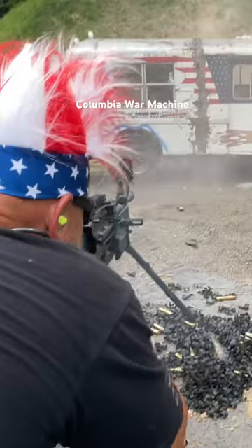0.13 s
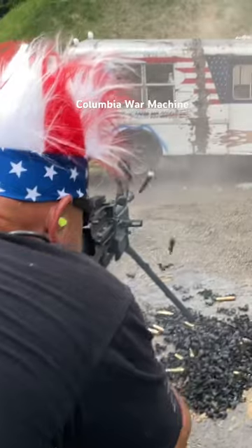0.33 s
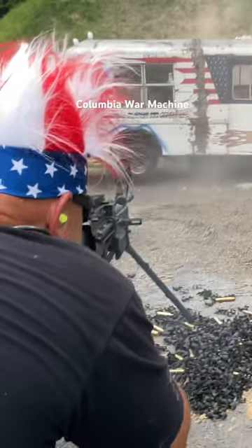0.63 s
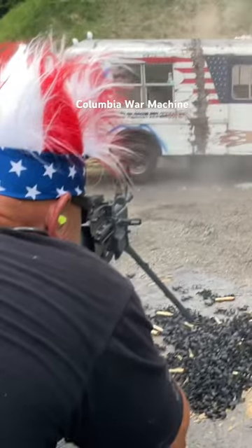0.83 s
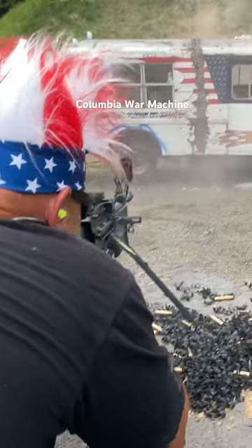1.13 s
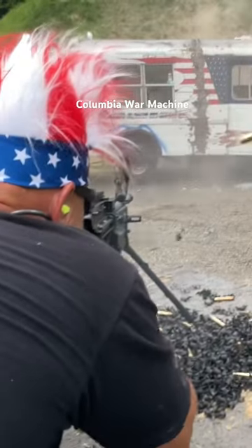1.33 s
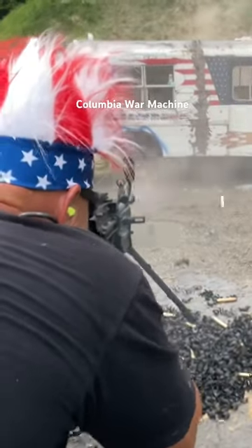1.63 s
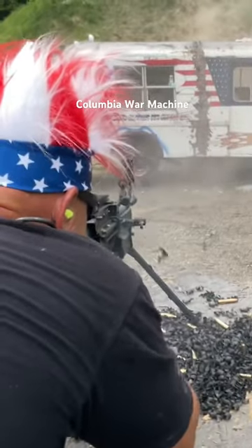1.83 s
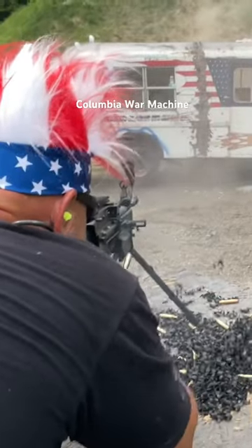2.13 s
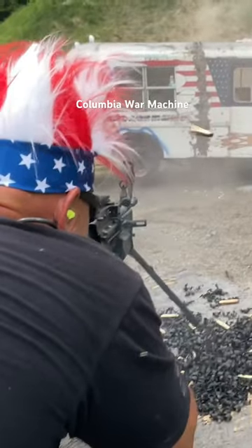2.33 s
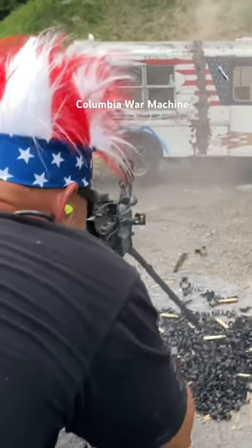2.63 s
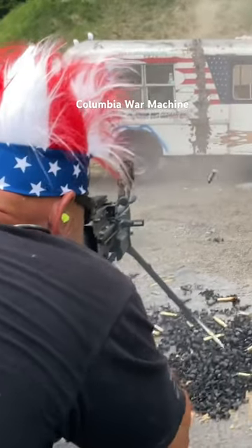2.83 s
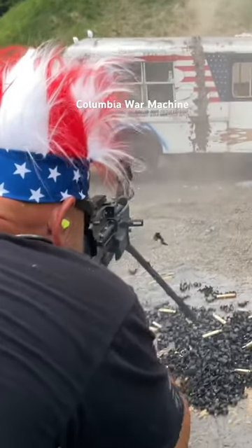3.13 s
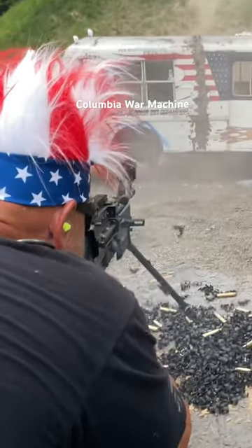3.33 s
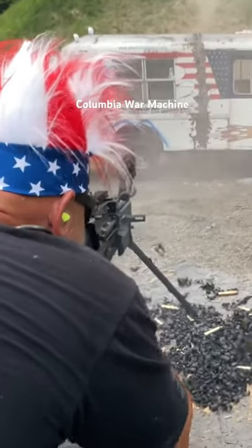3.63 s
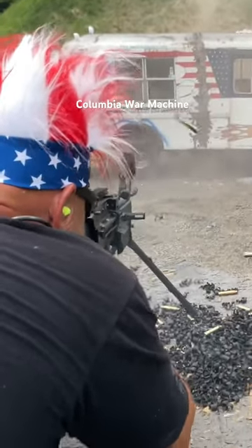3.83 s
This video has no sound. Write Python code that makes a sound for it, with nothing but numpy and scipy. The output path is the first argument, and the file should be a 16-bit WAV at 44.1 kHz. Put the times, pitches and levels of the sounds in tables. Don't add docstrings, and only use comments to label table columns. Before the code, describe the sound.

Close machine gun fire outdoors: a few rapid shots already under way, a half-second gap with rolling woodland echo and faint case clinks, then continuous even fire with metallic bolt clatter, loud and compressed in stereo.

```python
import sys
import numpy as np
from scipy import signal
from scipy.fft import rfft, irfft, next_fast_len
from scipy.io import wavfile
from scipy.ndimage import map_coordinates

SR = 44100
rng = np.random.default_rng(int(sys.argv[2]) if len(sys.argv) > 2 else 0)


def gain_from_db(level_db):
    decades = np.asarray(level_db, float) / 20
    return 10 ** decades


def waveform_to_disk(signal):
    frames = np.transpose(np.atleast_2d(signal))
    scaled = np.clip(frames, -1, 1) * 32767
    samples = np.round(scaled).astype(np.int16)
    wavfile.write(sys.argv[1], SR, samples)


N = 176400
PAD = SR // 4
CYCLE_S = .073534

# (frequency [Hz], density [dB per Hz])
HISS_SPECTRUM = [(1000, -3), (2500, -6.5), (5000, -1.5), (8200, 2), (11500, -2), (15800, 2.5)]
# (frequency [Hz], density [dB per Hz])
METAL_SPECTRUM = [(700, -1), (2000, -2), (4000, 0.5), (6500, 0), (9800, -3), (13000, -11), (15800, -11.5)]


def unit(x):
    return x / np.sqrt(np.mean(x ** 2) + 1e-20)


def along(points, hz):
    f, value = np.transpose(points)
    return np.interp(np.log(hz + 1), np.log(f + 1), value)


def filtered(x, response):
    size = next_fast_len(x.shape[-1] + SR // 2)
    spectrum = rfft(x, size) * response(np.fft.rfftfreq(size, 1 / SR))
    return irfft(spectrum, size)[..., :x.shape[-1]]


def train(times, gains):
    at = np.clip(np.round(times * SR).astype(int) + PAD, 0, N + PAD)
    return np.bincount(at, gains, N + PAD + 1)[:N + PAD]


def after(impulses, shape):
    return signal.fftconvolve(np.atleast_2d(impulses), np.atleast_2d(shape), axes=1)[:, :N + PAD]


def fall(t60, rise_s):
    t = np.arange(SR // 2) / SR
    return gain_from_db(-60 * t / t60) * (1 - np.exp(-t / rise_s)) ** 2


def near_noise(spectrum):
    # (frequency [Hz], phase [rad])
    port_phase = [(0, 0), (600, .6), (1460, .2), (2330, -2.6), (4390, -7), (7000, -8.3), (8500, -9.4),
                  (11500, -11.4), (13500, -12.5)]
    # (frequency [Hz], level [dB])
    port_lean = [(300, 2.5), (2400, 6), (4400, 0), (8000, 0)]
    alike = 0.84
    a, b, c = rng.standard_normal((3, N + PAD))
    pair = np.sqrt(alike) * a + np.sqrt(1 - alike) * np.array([b, c])
    side = np.array([[.5], [-.5]])

    def response(hz):
        level = gain_from_db(along(spectrum, hz) + side * along(port_lean, hz))
        return level * np.exp(1j * side * along(port_phase, hz))

    return unit(filtered(pair, response))


def wide_noise(spectrum, size):
    # (frequency [Hz], correlation [1])
    likeness = [(40, 0.76), (130, 1), (300, 0.9), (700, 0.48), (4000, 0.12)]

    def response(hz):
        turn = np.arccos(np.clip(along(likeness, hz), -1, 1)) / 2
        return gain_from_db(along(spectrum, hz)) * [np.cos(turn), np.sin(turn)]

    mid, side = filtered(rng.standard_normal((2, size)), response)
    return unit(np.array([mid + side, mid - side]))


def firing():
    # (first shot [s], shots [count])
    bursts = [
        (-.0757, 6),
        (.9182, 42),
    ]
    # (time [s], lag behind the even cycle [s])
    drag = [(0, -.0), (.9, -.0017), (1.3, .0002), (1.8, .0001), (2.15, .0016), (2.45, .0011), (2.6, .0002),
            (3.0, .0001), (3.2, -.0012), (3.65, .0), (4, -.0003)]
    jitter_s, scatter_db = .0002, 1.11
    even = np.concatenate([s + CYCLE_S * np.arange(count) for s, count in bursts])
    luck = rng.standard_normal((len(even), 12))
    times = even + np.interp(even, *np.transpose(drag)) + jitter_s * luck[:, 0]
    return times, gain_from_db(scatter_db * luck[:, 1]), luck[:, 2:]


def shaded(f):
    # (frequency [Hz], width [Hz], level [dB])
    modes = [(236.5, 37, -9.5), (437, 40, 3), (673, 77, -5), (1038, 72, 4.5), (1138, 95, -5.5),
             (1254, 47, 2), (1425, 107, 0.5), (1600, 53, 4.5), (2390, 120, 4)]
    return np.prod([1 + (gain_from_db(db) - 1) * 1j * f * w / (c * c - f * f + 1j * f * w) for c, w, db in modes], axis=0)


def blast():
    path_s = [.0014, .0029, .0045, .0057, .0089, .0111, .0128, .0146, .0195, .025, .0286, .0325]
    # (left level [dB], right level [dB])
    path_levels = [(-15, -39), (-1, -16.5), (-15.5, -45), (-9, -8.5), (-3.5, -10), (-4.5, -8.5), (-12, -26),
                   (-10.5, -15.5), (-16.5, -16.5), (-11.5, -13), (-42.5, -38), (-20.5, -18.5)]
    # (frequency [Hz], density [dB per Hz])
    scatter_spectrum = [(250, -0.5), (350, 13), (520, 3), (750, -16), (1050, 5.5), (1350, 3), (2400, -13.5),
                        (4000, -50)]
    # frequency [Hz], trough [s], centre [s], half length [s]
    ground_wave = (150, .023, .0212, .0054)
    blast_db, scatter_db, thump_db, thump_lean_db = -7.5, -19.5, -22, 2.5
    push_s, lengthens = 0.00027, .025
    t = np.arange(SR // 10) / SR
    out = np.zeros((2, len(t)))
    for s, db in zip(path_s, path_levels):
        u = np.clip((t - s) / (push_s + lengthens * s) + 1, 0, None)
        pulse = u * (2 - u) * np.exp(1 - u)
        out += gain_from_db(blast_db + np.array(db))[:, None] * pulse

    def low_cut(f):
        edge = 1j * f / 210
        return edge ** 2 / (1 + edge + edge ** 2)

    out = filtered(out, low_cut)
    scatter = fall(0.079, 0.002) * near_noise(scatter_spectrum)[:, :SR // 2]
    out += gain_from_db(scatter_db) * scatter[:, :len(t)]
    hz, trough_s, centre_s, half_s = ground_wave
    wave = -np.cos(2 * np.pi * hz * (t - trough_s)) * np.exp(-.5 * ((t - centre_s) / half_s) ** 2)
    return out + gain_from_db(thump_db + thump_lean_db * np.array([[.5], [-.5]])) * wave


def shots(times, sizes, luck):
    # (delay [s], level [dB])
    echoes = [
        (.0802, -9),
        (.1105, -14),
        (.152, -23),
        (.192, -21),
    ]
    # (frequency [Hz], density [dB per Hz])
    crack_spectrum = [(700, -25), (1500, 3), (2500, 6.5), (5000, -5), (8200, 0), (9800, -12.5), (11500, -8),
                      (15800, -1.5)]
    crack_db, hiss_db, slap_body_db = -17, -30, 3
    lead_s, slap_jitter_s, slap_shortens_s = 0.002, 0.00061, 0.018
    slaps = 0
    for k, (s, db) in enumerate(echoes):
        slaps = slaps + train(times + s + slap_jitter_s * luck[:, k], sizes * gain_from_db(db))
    direct = train(times, sizes)
    one = filtered(blast(), shaded)
    short = one * gain_from_db(slap_body_db) * np.exp(-np.arange(one.shape[1]) / SR / slap_shortens_s)

    def slap_band(f):
        return 2360 / (2360 + 1j * f) * 1j * f / (200 + 1j * f)

    def slap_dulling(f):
        return (4000 / (4000 + 1j * f)) ** 2

    def snap(hits):
        early = np.roll(hits, -round(lead_s * SR))
        return after(early, fall(0.04, 0.0018)) * near_noise(crack_spectrum)

    body = after(direct, one) + after(filtered(slaps, slap_band), short)
    crack = snap(direct) + filtered(snap(slaps), slap_dulling)
    hiss_power = np.abs(after(direct, fall(0.2, .008) ** 2))
    hiss = gain_from_db(hiss_db) * np.sqrt(hiss_power) * near_noise(HISS_SPECTRUM)
    return body + gain_from_db(crack_db) * crack + hiss


def tail(times, sizes):
    # (frequency [Hz], density [dB per Hz])
    tail_spectrum = [(35, -30), (65, -5.5), (230, -9.5), (450, -2), (800, -6), (2100, -17.5), (8400, -21.5),
                     (15800, -19)]
    # (frequency [Hz], t60 [s])
    tail_t60 = [(100, 1.33), (500, 1.51), (2000, 1.25), (6000, 1.07), (14000, 0.49)]
    tail_db, grain_db = -36.5, 2.5
    out = 0
    for k in range(3):
        grain = map_coordinates(rng.standard_normal(200), [np.arange(2 * SR) * 60 / SR])
        lumps = gain_from_db(grain_db * grain)
        hz, t, z = signal.stft(wide_noise(tail_spectrum, size=2 * SR) * lumps, SR, nperseg=512)
        decay = gain_from_db(-60 * t / along(tail_t60, hz)[:, None]) * (1 - np.exp(-t / 0.026))
        roll = signal.istft(z * decay, SR, nperseg=512)[1]
        out = out + after(train(times[k::3], sizes[k::3]), roll)
    return gain_from_db(tail_db) * out


def bolt(times, luck):
    # (time [s], level [dB])
    clatter = [(0, -31), (.9, -31.5), (1.5, -32.5), (2.2, -27), (2.7, -29), (3.2, -30.5), (4, -27.5)]
    steady_slams = [
        2.006,
        2.153,
        2.227,
        2.594,
        2.667,
        2.741,
        2.888,
        3.034,
        3.107,
    ]
    after_shot_s, jitter_s = .0565, 0.00063
    scatter_db, steady_db = 1, 0
    at = times + after_shot_s + jitter_s * luck[:, 7]
    steady = np.abs(at[:, None] - steady_slams).min(axis=1) < CYCLE_S / 3
    db = np.interp(times, *np.transpose(clatter)) + scatter_db * luck[:, 6] * ~steady + steady_db * steady
    return after(train(at, gain_from_db(db)), fall(0.065, 0.00085)) * near_noise(METAL_SPECTRUM)


def cases():
    # (time [s], level [dB], t60 [s])
    landings = [
        (.469, -46, .02),
        (.6817, -36, .02),
    ]
    # (frequency [Hz], density [dB per Hz])
    tick_spectrum = [(400, -24), (900, 9), (2500, -1), (7000, -20.5), (15000, -26)]
    # time [s], level [dB], t60 [s]
    trigger_pull = (.872, -62, .12)
    # (time [s], frequency [Hz], level [dB], t60 [s])
    ring_modes = [
        (.734, 10750, -74, .3),
        (.734, 13900, -73, .25),
        (.778, 14900, -68, .2),
        (.684, 13800, -70, .1),
        (.873, 6300, -66, .08),
        (.873, 7800, -64, .08),
        (.873, 13000, -70, .06),
    ]
    out = 0
    for s, db, t60 in landings:
        out = out + after(train(np.array([s]), gain_from_db([db])), fall(t60, 0.00033)) * near_noise(tick_spectrum)

    s, db, t60 = trigger_pull
    clicks = train(np.array([s, s + .02, s + .032]), gain_from_db([db, db, db + 8]))
    out += after(clicks, fall(t60, .001)) * near_noise(HISS_SPECTRUM)

    patter_per_s, patter_db, spread_db = 60, -41.5, 4
    at = np.cumsum(rng.exponential(1, 600)) / patter_per_s
    size = rng.exponential(1, 600)
    firing_now = (at < .43) | (at > 1.0)
    patter = train(at, firing_now * gain_from_db(patter_db + spread_db * size))
    out += after(patter, fall(0.0078, 0.00037)) * near_noise(METAL_SPECTRUM)

    t = np.arange(SR // 2) / SR
    for s, hz, db, t60 in ring_modes:
        wobble = rng.standard_normal(len(t) // 300 + 1).repeat(300)[:len(t)]
        flutter = gain_from_db(db - 1 + 4.6 * wobble)
        out[:, PAD + round(s * SR):][:, :len(t)] += flutter * fall(t60, .001) * np.sin(2 * np.pi * hz * t)
    return out


def still_air():
    # (frequency [Hz], density [dB per Hz])
    air_spectrum = [(40, -32), (420, -2), (3500, -21), (8400, -45), (9000, -70), (15800, -65)]
    return gain_from_db(-57) * wide_noise(air_spectrum, size=N)


def scene():
    times, sizes, luck = firing()
    mix = shots(times, sizes, luck) + tail(times, sizes) + bolt(times, luck) + cases()
    return mix[:, PAD:] + still_air()


def starved(x):
    # low [Hz], high [Hz]
    gap_hz = (8480, 11036)
    gap_opens = [.918, 1.655, 1.876, 2.022, 2.18, 2.25, 2.6, 2.675, 2.745, 2.905, 3.04, 3.115, 3.77]
    ragged_hz, open_db = 220, -6
    hz, t, z = signal.stft(x, SR, nperseg=1024)
    ragged = np.repeat(rng.standard_normal((2, len(t))), 3, axis=1)[:, :len(t)]
    low, high = np.array(gap_hz)[:, None] + ragged_hz * ragged
    opened = gain_from_db(open_db) * (np.abs(t[:, None] - gap_opens).min(axis=1) < 512 / SR)
    inside = (hz[:, None] > low) & (hz[:, None] < high)
    return signal.istft(z * np.where(inside, opened, 1), SR, nperseg=1024)[1][:, :N]


def top_cut(x):
    return signal.sosfilt(signal.butter(12, 17010, fs=SR, output="sos"), x)


def record(dry):
    # (time [s], level [dB])
    fade_in = [(0.035, -46), (0.04, -18), (.06, 2), (.08, 3), (.105, 7)]
    ceiling, top_hz, low_cut_hz = 0.78, 15780, 55
    s, db = np.transpose(fade_in)
    t = np.arange(N) / SR
    started = t > s[0]
    x = dry * gain_from_db(np.interp(t, s, db)) * started
    x = x / (1 + np.abs(x / ceiling) ** 6) ** (1 / 6)

    def band(hz):
        return np.clip((top_hz - hz) / 200 + .5, 0, 1) * (1j * hz / (low_cut_hz + 1j * hz)) ** 2

    return top_cut(filtered(starved(x), band) * started)


dry = scene()
out = record(dry)
waveform_to_disk(out)
```